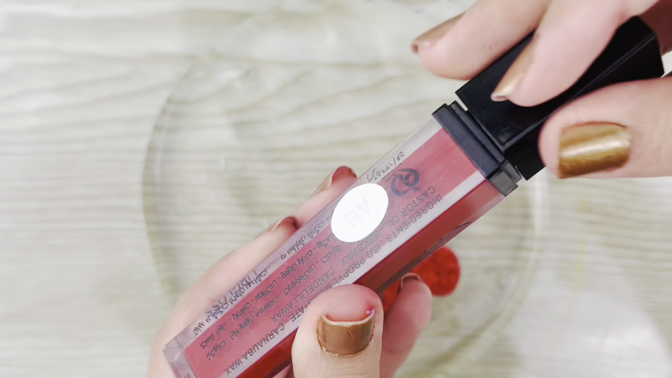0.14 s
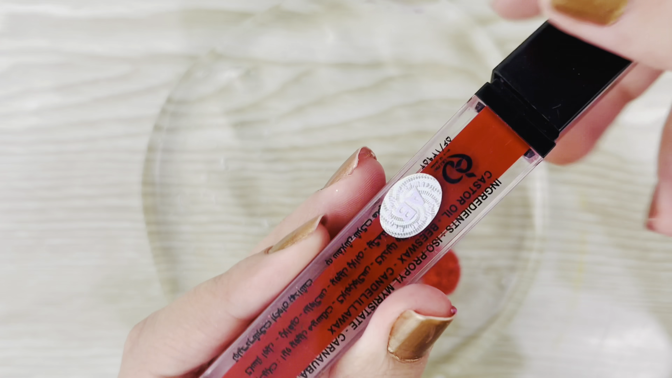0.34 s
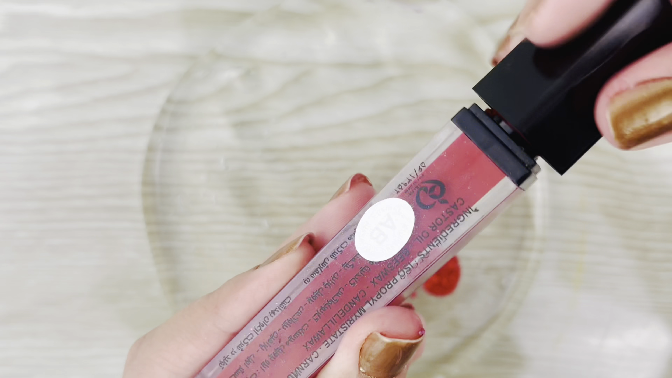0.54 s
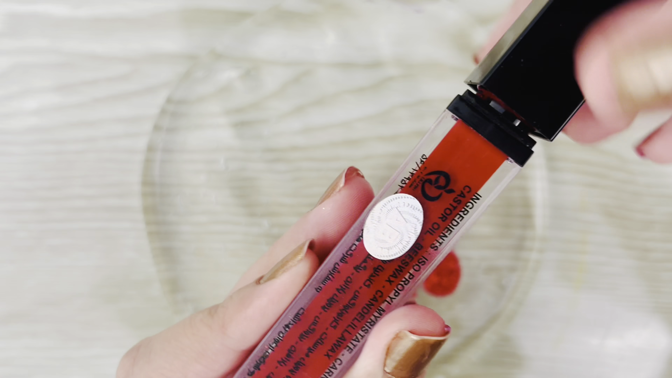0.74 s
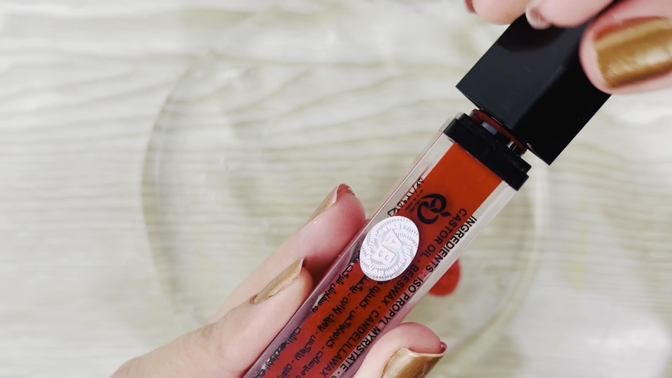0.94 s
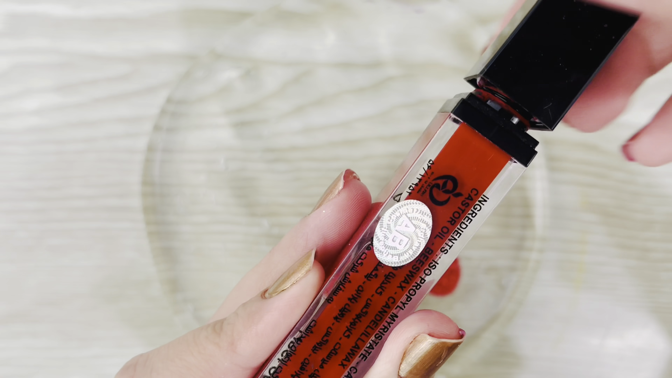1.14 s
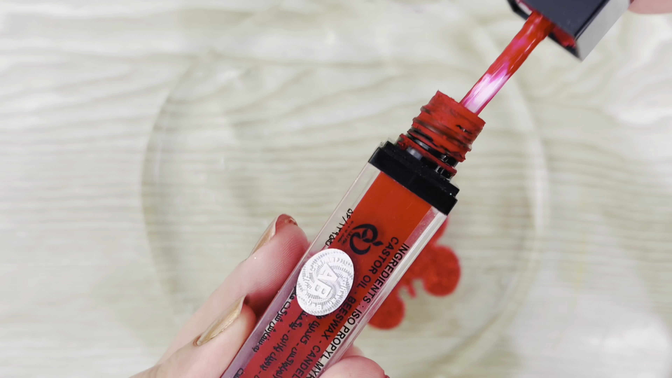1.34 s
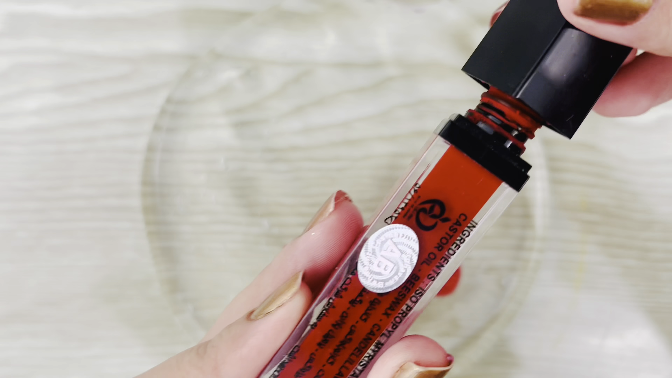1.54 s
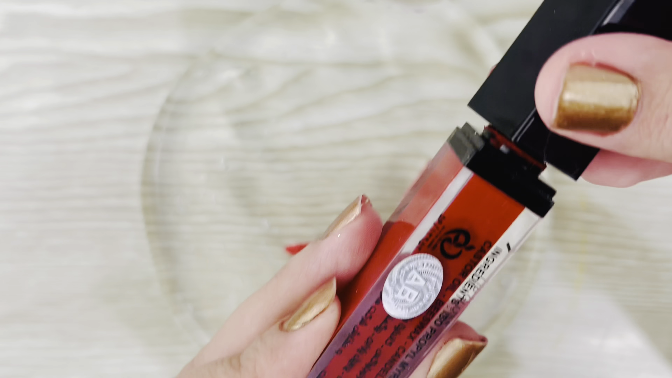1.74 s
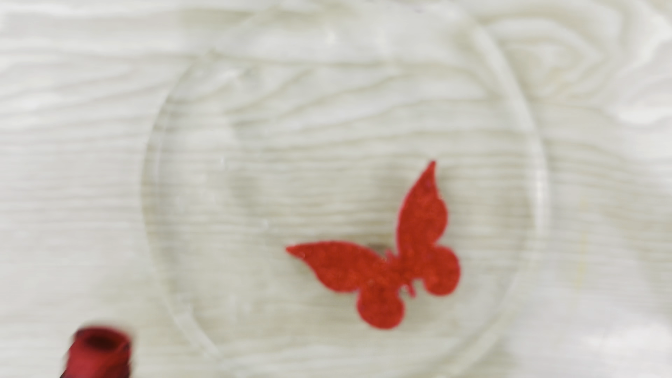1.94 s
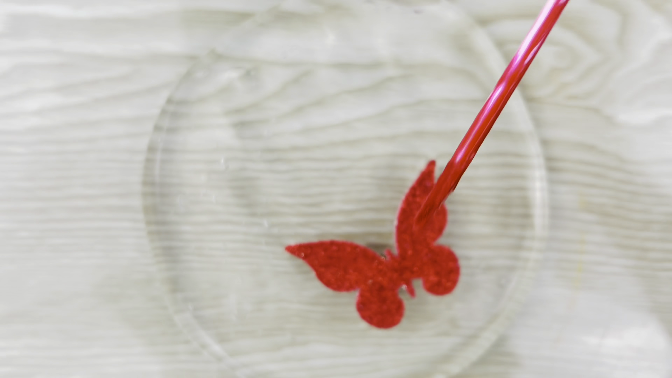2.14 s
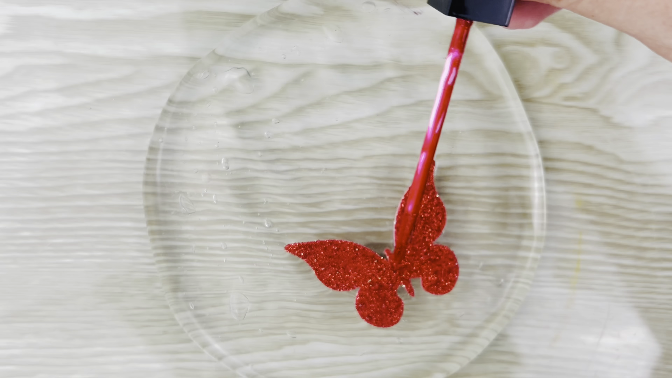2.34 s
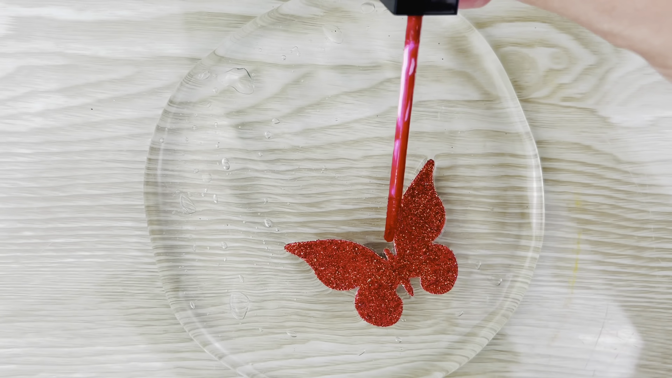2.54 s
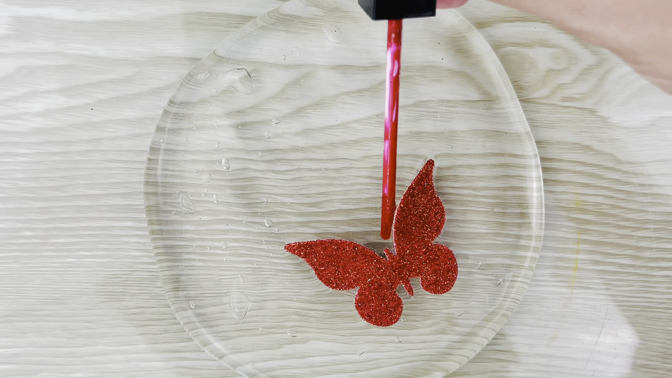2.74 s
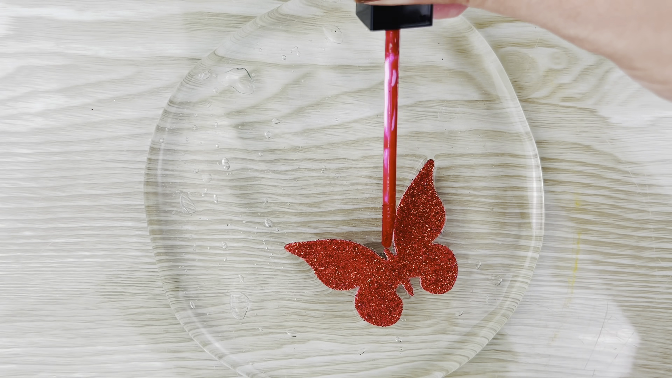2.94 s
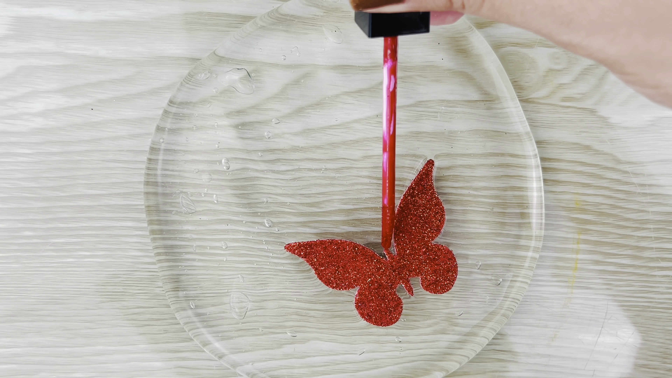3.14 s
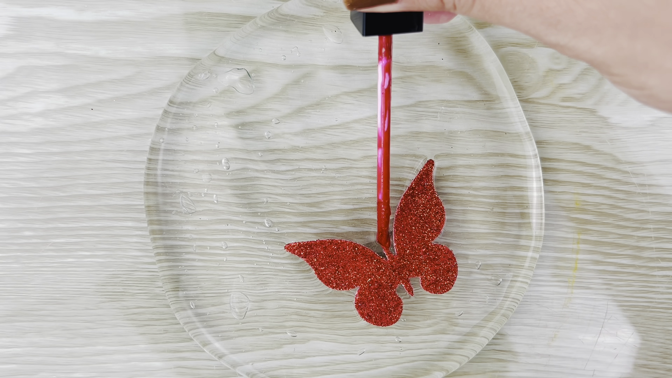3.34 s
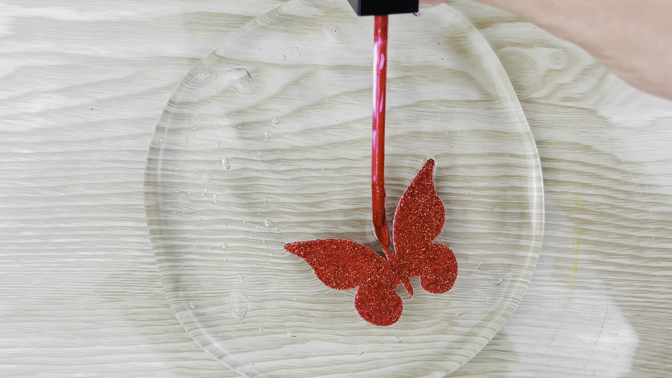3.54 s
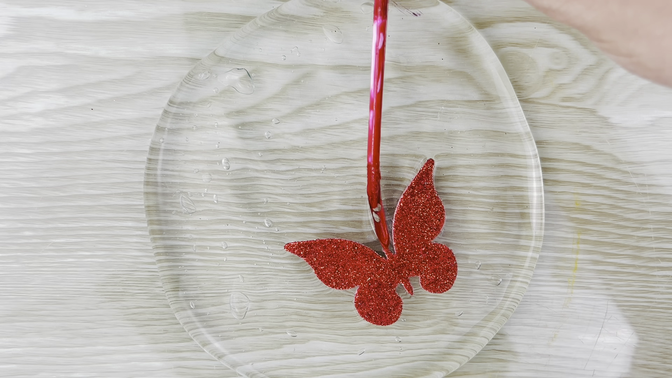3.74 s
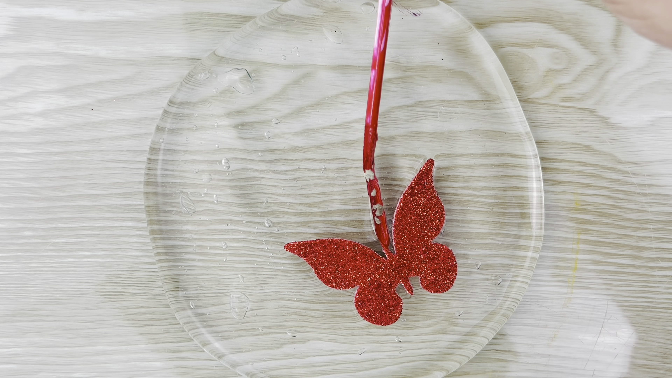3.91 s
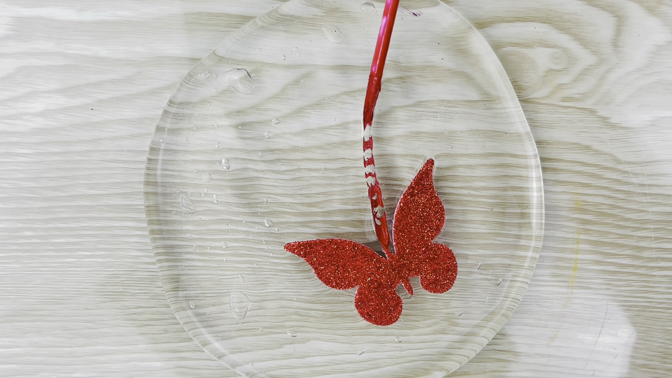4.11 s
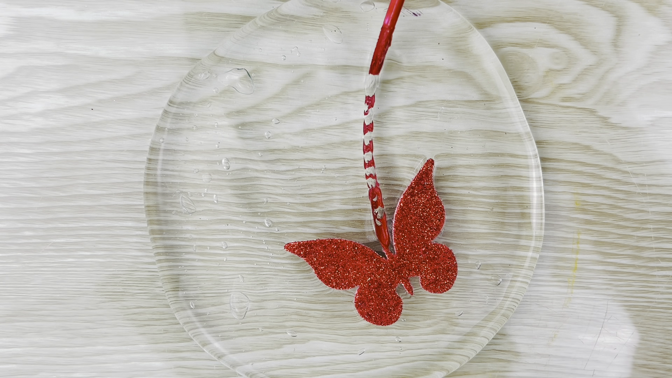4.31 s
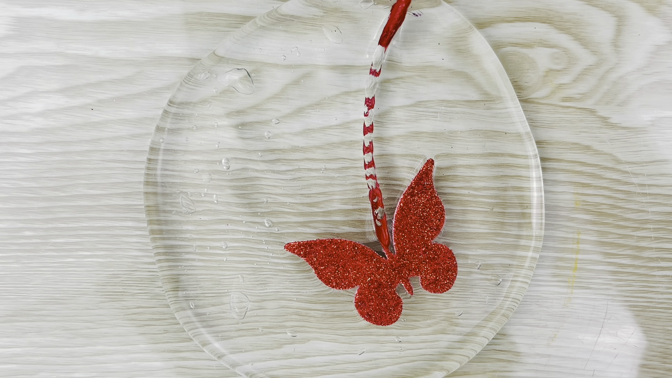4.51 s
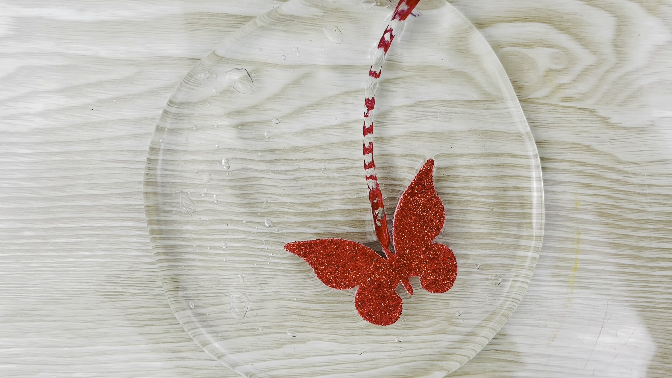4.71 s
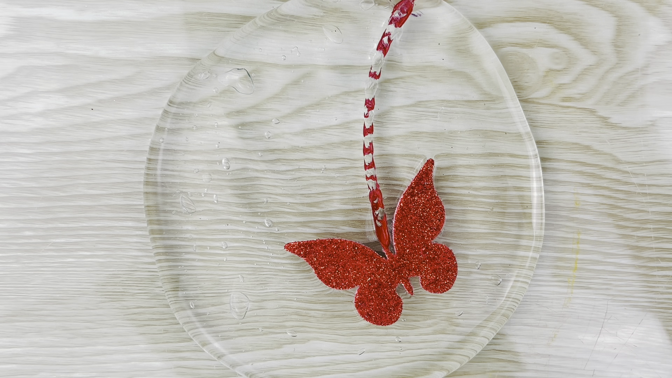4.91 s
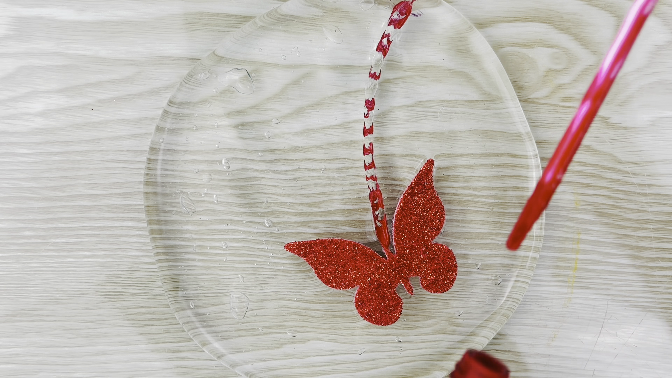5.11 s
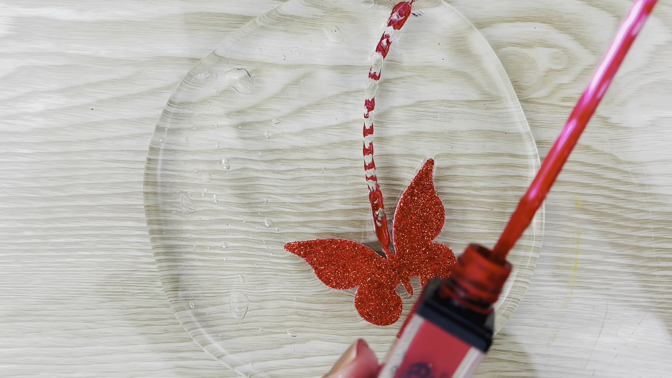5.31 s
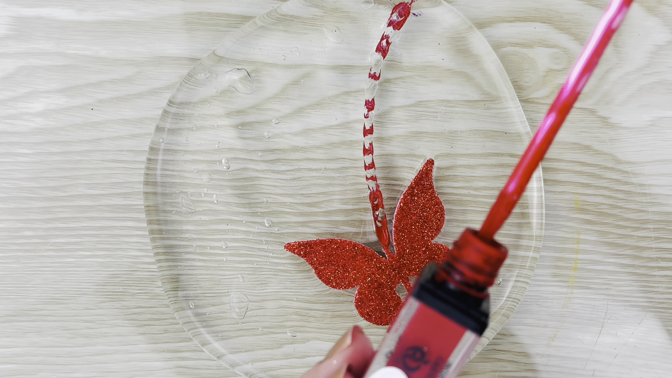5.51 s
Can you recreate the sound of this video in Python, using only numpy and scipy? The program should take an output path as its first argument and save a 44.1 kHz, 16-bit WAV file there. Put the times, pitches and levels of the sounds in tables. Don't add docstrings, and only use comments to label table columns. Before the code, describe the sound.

Stereo close-up of a slim lip-colour tube being opened indoors. Airy, high skin rubs come first, then a quick cluster of hard plastic ticks and scrapes, a few knocks, and a loud hollow pop rising slightly in pitch. The left side hears the hands directly, the right softer and more scattered. Afterwards a tiny tap, a long quiet stretch of fan hum, and sparse faint handling.

```python
import sys
import numpy as np
from scipy import signal
from scipy.fft import rfft, irfft, next_fast_len
from scipy.io import wavfile
from scipy.ndimage import uniform_filter1d, map_coordinates

SR = 44100
rng = np.random.default_rng(int(sys.argv[2]) if len(sys.argv) > 2 else 0)


def boost(x):
    u = np.asarray(x, float) / 20
    return 10 ** u


def waveform_to_disk(signal):
    frames = np.transpose(np.atleast_2d(signal))
    scaled = np.clip(frames, -1, 1) * 32767
    samples = np.round(scaled).astype(np.int16)
    wavfile.write(sys.argv[1], SR, samples)


N = 249839


def unit(x):
    return x / np.sqrt(np.mean(x ** 2) + 1e-20)


def along(points, hz):
    point_hz, value = np.transpose(points)
    return np.interp(np.log(hz + 1), np.log(point_hz + 1), value)


def filtered(x, response):
    size = next_fast_len(x.shape[-1] + 4096)
    spectrum = rfft(x, size) * response(np.fft.rfftfreq(size, 1 / SR))
    return irfft(spectrum, size)[..., :x.shape[-1]]


def resonance(hz, centre_hz, width_hz):
    return 1 / (1 + (2 * (hz - centre_hz) / width_hz) ** 2)


def resonant_body(modes, hz):
    return 1 + sum(gain * resonance(hz, mode_hz, width_hz) for mode_hz, width_hz, gain in modes)


def wobble(rate, size):
    knots = rng.standard_normal(int(size * rate / SR) + 4)
    return map_coordinates(knots, [np.arange(size) * rate / SR])


def add(track, s, sound):
    part = track[round(s * SR):][:len(sound)]
    part += sound[:len(part)]


def stereo_noise(gain):
    # pitch_hz, left_right_likeness [-1..1]
    likeness = [(60, .3), (130, .3), (290, .75), (640, .2), (1400, 0)]

    def mid_side_gain(hz):
        turn = np.arccos(np.clip(along(likeness, hz), -1, 1)) / 2
        return gain(hz) * [np.cos(turn), np.sin(turn)]

    mid, side = filtered(rng.standard_normal((2, N)), mid_side_gain)
    return unit(np.array([mid + side, mid - side]))


def fan_and_room():
    # pitch_hz, level_db_per_hz
    rumble = [(29, -77), (50, -49.5), (69, -36), (83, -10.5), (104, -4.5), (225, -12), (283, -2),
              (308, -10.5), (602, -14.5), (653, -12), (936, -21.5), (1430, -25.5), (2500, -43.5),
              (3250, -64.5), (5500, -120)]
    # pitch_hz, width_hz, level_db
    drones = [(118, 16, -72), (285, 36, -70), (1440, 70, -81)]
    # pitch_hz, level_db, wander_hz
    blade_hz, blade_db, wander_hz = (285, -70.5, 2.4)
    x = boost(-63.5 + .8 * wobble(3, N)) * stereo_noise(lambda hz: boost(along(rumble, hz)))
    for centre_hz, width_hz, db in drones:
        x = x + boost(db) * stereo_noise(lambda hz: resonance(hz, centre_hz, width_hz))
    blade_phase = 2 * np.pi * np.cumsum(blade_hz + wander_hz * wobble(12, N)) / SR
    x = x + boost(blade_db + 1.5 * wobble(4, N)) * np.sin(blade_phase)
    return x * boost([[.8], [-.8]])


def microphone_hiss():
    # pitch_hz, level_db_per_hz
    hiss = [(900, -30), (1500, -4), (2200, -10), (4600, -10.5), (7600, -18), (9100, -18), (10100, -10),
            (12300, -7.5), (13000, -11.5), (13300, -55), (15500, -60)]
    return boost(-72.5) * stereo_noise(lambda hz: boost(along(hiss, hz)))


def strokes(rows, grain_db, clump_db, skirt_db, body):
    lead = SR // 4
    track = np.zeros(N + SR)
    t = np.arange(SR // 2) / SR - 1 / 4

    def hump(hz, centre_hz, octaves):
        return np.exp(-np.abs(np.log2((hz + 1) / centre_hz) / octaves) ** 1.5)

    for peak_s, db, rise_s, fall_s, centre_hz, octaves in rows:
        grain = grain_db * rng.exponential(size=len(t))
        clumps = clump_db * wobble(350, len(t))
        slips = rng.standard_normal(len(t)) * boost(grain + clumps)

        def colour(hz):
            skirt = boost(skirt_db) * hump(hz, .4 * centre_hz, 1.3)
            return (hump(hz, centre_hz, octaves) + skirt) * body(hz)

        swell = np.exp(-np.where(t < 0, -t / rise_s, t / fall_s) ** 1.4 * 2)
        add(track, peak_s, boost(db) * swell * unit(filtered(slips, colour)))
    return track[lead:][:N]


def finger_rubs():
    # peak_s, level_db, fall_s, centre_hz
    rubs = [(.012, -48, .06, 10400), (.148, -48.5, .038, 10000), (.25, -53, .028, 11300),
            (.385, -70, .022, 10000), (.53, -55, .07, 10400), (.578, -38.5, .022, 10000),
            (.665, -59, .025, 10400), (.725, -55, .025, 12000), (.838, -61.5, .015, 10700),
            (.92, -52, .05, 11200), (.985, -56.5, .022, 11300), (1.07, -62.5, .033, 12000),
            (1.205, -55, .03, 11080), (3.83, -73, .022, 7800), (4.385, -68, .025, 13500),
            (4.592, -55.5, .026, 11500), (4.975, -62, .015, 8000), (5.3, -66, .035, 13500),
            (5.33, -72, .035, 7460), (5.66, -49, .045, 10500)]
    # pitch_hz, width_hz, extra_gain
    grip = [(4015, 570, 2.6), (5600, 1500, -.7), (8000, 1200, 0.42), (11970, 1100, -1.04),
            (13500, 1300, .5)]
    firm_db, narrowing_octaves_per_db = -56, .03
    rows = []
    for peak_s, db, fall_s, hz in rubs:
        octaves = max(.1, .53 - narrowing_octaves_per_db * max(0, firm_db - db))
        rows.append((peak_s, db, .75 * fall_s, fall_s, hz, octaves))
    return strokes(rows, grain_db=1.5, clump_db=3.0, skirt_db=-30, body=lambda hz: resonant_body(grip, hz))


def plastic_strokes(rows):
    # pitch_hz, width_hz, extra_gain
    cap = [(2100, 400, .8), (3750, 500, 1.5), (6100, 380, 1.5), (8500, 900, .8)]
    return strokes(rows, grain_db=1.82, clump_db=2, skirt_db=-16.5, body=lambda hz: resonant_body(cap, hz))


def with_sheen(table, rise_share, octaves, sheen_hz, sheen_octaves):
    rows = []
    for peak_s, db, fall_s, hz, sheen_under_db in table:
        rise_s = rise_share * fall_s
        rows.append((peak_s, db, rise_s, fall_s, hz, octaves))
        rows.append((peak_s, db - sheen_under_db, rise_s, fall_s, sheen_hz, sheen_octaves))
    return rows


def thread_scrapes():
    # peak_s, level_db, fall_s, centre_hz, sheen_under_db
    scrapes = [(1.295, -42, .025, 3800, 40), (1.313, -35, .015, 5800, 14), (1.335, -36, .025, 5600, 14),
               (1.362, -37, .024, 5700, 14), (1.43, -63, .043, 4500, 20), (1.515, -55, .038, 4800, 20),
               (1.541, -36.5, .018, 4000, 19), (1.636, -48.5, .012, 5300, 20), (1.648, -50, .03, 5500, 12),
               (1.86, -36, .035, 3500, 20), (2.265, -54, .022, 3100, 40), (5.66, -54, .05, 3800, 14)]
    return plastic_strokes(with_sheen(scrapes, rise_share=.4, octaves=.43, sheen_hz=13600, sheen_octaves=.22))


def wand_drags():
    # peak_s, level_db, fall_s, centre_hz, sheen_under_db
    drags = [
        (1.703, -31.5, .022, 5000, 25),
        (1.721, -31, .022, 8500, 6),
        (1.840, -31, .02, 5500, 12),
        (1.894, -10, .011, 6800, 12),
    ]
    # peak_s, level_db, rise_s, fall_s, centre_hz, width_octaves
    rocking = (1.715, -39, .015, .03, 950, 1.1)
    rows = with_sheen(drags, rise_share=.22, octaves=.95, sheen_hz=12800, sheen_octaves=.25)
    return plastic_strokes(rows + [rocking])


def air_leak():
    # centre_hz, width_octaves, level_db
    bands = [
        (140, .4, -39),
        (800, .6, -44),
        (6300, .2, -22),
        (11000, .7, -22),
        (14500, .1, -30),
    ]
    peak_s, rise_s, fall_s = 1.878, .012, .022
    return plastic_strokes([(peak_s, db, rise_s, fall_s, hz, octaves) for hz, octaves, db in bands])


def contacts(rows):
    ring, knock = np.zeros(N), np.zeros(N)
    t = np.arange(SR // 20) / SR
    for s, db, hz, t60, knock_db in rows:
        chance = rng.standard_normal(len(t))
        ring_swell = (1 - np.exp(-9 * t / t60)) ** 2 * boost(-60 * t / t60)
        blur = .1 * np.cumsum(uniform_filter1d(chance, size=12))
        add(ring, s, boost(db + 16) * ring_swell * np.sin(2 * np.pi * hz * t + blur))
        knock_swell = (1 - np.exp(-t / .0005)) * boost(-60 * t / .013)
        add(knock, s, boost(db + knock_db + 11) * knock_swell * chance)
    cap_band = signal.butter(4, [750, 4500], "bandpass", fs=SR, output="sos")
    return ring + signal.sosfilt(cap_band, knock)


def thread_ticks():
    # start_s, peak_db, ring_hz
    tick_table = [(.0144, -43, 10400), (.1446, -46.5, 10440), (.5726, -38.5, 11200), (.8375, -47, 10020),
                  (.9324, -49.5, 10400), (1.2032, -46, 8630), (1.3145, -35, 5700), (1.3304, -27, 5900),
                  (1.3404, -44, 6250), (1.3514, -38, 5700), (1.3598, -33, 5800), (1.3664, -29, 5840),
                  (1.4875, -45, 6150), (1.5054, -50, 5800), (1.5274, -40, 4770), (1.5314, -37, 4630),
                  (1.5424, -33.5, 6800), (1.5474, -35, 3440), (1.6322, -45, 4570), (1.6442, -41.5, 4560),
                  (1.6499, -43.5, 4700), (4.3974, -61, 10970)]
    rows = []
    for s, db, hz in tick_table:
        t60 = .007 * (5800 / hz) ** .4
        knock_db = -15 - 5 * np.log2(hz / 5800)
        rows.append((s, db, hz, t60, knock_db))
    return contacts(rows)


def catches():
    # start_s, peak_db, ring_hz, ring_t60_s
    slips = [(1.1785, -37.5, 8500, .0016), (1.289, -23.5, 3750, .007), (1.3098, -21, 5300, .0024),
             (1.3101, -27, 6800, .003), (1.5359, -27, 3610, .011), (1.8435, -19, 4050, .009),
             (1.871, -17.5, 6200, .0055), (1.8743, -13, 6300, .006), (1.879, -15, 6500, .005),
             (1.895, -14, 4100, .007), (4.5875, -40, 8200, .002), (4.9701, -49, 7000, .0016)]
    return contacts([(*row, -19) for row in slips])


def wand_knocks():
    # start_s, peak_db, ring_hz, tip_db, tip_hz
    knocks = [
        (1.698, -32, 4100, -38, 10500),
        (1.7036, -23.5, 3600, -26, 8600),
        (1.718, -21.5, 3800, -26, 9000),
        (1.7215, -19.5, 2700, -24, 10800),
        (1.7339, -36, 2700, -45, 10800),
        (1.8374, -31, 3200, -30, 8800),
    ]
    stem = [(s, db, hz, .004, -4) for s, db, hz, _, _ in knocks]
    tip = [(s, db, hz, .008, -15) for s, _, _, db, hz in knocks]
    return contacts(stem + tip)


def tube_set_down():
    bounce_s, loss_db = .0032, 4.5
    return contacts([(2.2611 + k * bounce_s, -37 - k * loss_db, 3200, .0035, -11) for k in range(3)])


def wand_snap():
    # ring_hz, peak_db, ring_t60_s
    modes = [
        (4000, -14, .007),
        (5800, -7.5, .0044),
        (7900, -14.5, .006),
        (11200, -19, .014),
        (12860, -15, .012),
    ]
    return contacts([(1.8912, db, hz, t60, -15) for hz, db, t60 in modes])


def hollow_pop():
    # time_s, pitch_hz, level_db
    cavity = [
        (1.8908, 520, -45.5),
        (1.892, 540, -13),
        (1.8955, 570, -9.5),
        (1.9, 620, -9.5),
        (1.906, 665, -13.5),
        (1.912, 670, -22),
        (1.93, 660, -48.5),
    ]
    # mode_hz, level_db, t60_s
    jolt = [(119, -33, .2), (180, -30, .16), (350, -33, .08), (410, -24, .17), (550, -26, .22),
            (840, -18, .04), (1130, -29, .04), (1500, -28, .03)]
    s, hz, db = np.transpose(cavity)
    track = np.zeros(N)
    t = np.arange(s[0], s[-1], 1 / SR)
    phase = 2 * np.pi * np.cumsum(np.interp(t, s, hz)) / SR
    add(track, s[0], boost(np.interp(t, s, db)) * np.sin(phase))
    after = np.arange(SR // 4) / SR
    for mode_hz, mode_db, t60 in jolt:
        swell = boost(mode_db - 60 * after / t60) * (1 - np.exp(-after / .001994))
        add(track, s[0], swell * np.sin(2 * np.pi * mode_hz * after))
    return track


def room_tails():
    # pitch_hz, t60_s
    decay = [(200, .3), (600, .24), (2000, .26), (5000, .21), (14000, .18)]
    hz, t, z = signal.stft(rng.standard_normal((2, SR // 2)), SR, nperseg=128)
    fade = boost(-60 * t / along(decay, hz)[:, None])
    tails = signal.istft(z * fade, SR, nperseg=128)[1]
    return tails / np.linalg.norm(tails, axis=1, keepdims=True)


def microphones(x):
    # pitch_hz, level_db
    shadow = [(100, -8), (300, 2), (600, -11), (2500, -6.5), (6400, -17.5), (8200, -18.5), (9800, -3.5),
              (11500, 2), (13000, -1), (15500, 7.5)]
    lag_s, smear_t60, bend_hz, room_db, right_room_db = .00036, .022, 1100, -14, 5

    def bends_round(hz):
        return 1 / (1 + (hz / bend_hz) ** 4)

    t = np.arange(SR // 10) / SR
    scatter = rng.standard_normal(len(t)) * (1 - np.exp(-t * SR / 32)) * boost(-60 * t / smear_t60)
    scattered = signal.fftconvolve(x, scatter / np.linalg.norm(scatter))[:N]
    right = filtered(x, bends_round) + filtered(scattered, lambda hz: 1 - bends_round(hz))
    right = np.pad(right, (round(lag_s * SR), 0))[:N]
    delayed = np.pad(x, (250, 0))[None]
    room = boost(room_db) * signal.fftconvolve(delayed, room_tails(), axes=1)[:, :N]
    right = filtered(right + boost(right_room_db) * room[1], lambda hz: boost(along(shadow, hz)))
    left = filtered(x + room[0], lambda hz: 1 - .6 * resonance(hz, 11700, 1500))
    return np.array([left, right])


def scene():
    friction = finger_rubs() + thread_scrapes() + wand_drags() + air_leak()
    clicks = thread_ticks() + catches() + wand_knocks() + tube_set_down()
    release = wand_snap() + hollow_pop()
    return microphones(friction + clicks + release) + fan_and_room() + microphone_hiss()


def band_limit(x):
    return signal.sosfilt(signal.butter(12, 15730, fs=SR, output="sos"), x)


def record(dry):
    bass_cut = signal.butter(10, 94, "highpass", fs=SR, output="sos")
    x = signal.sosfilt(bass_cut, dry)
    x = filtered(x, lambda hz: 1 / (1 + (hz / 15000) ** 24))
    return band_limit(np.clip(x, -1, 1))


dry = scene()
out = record(dry)
waveform_to_disk(out)
```